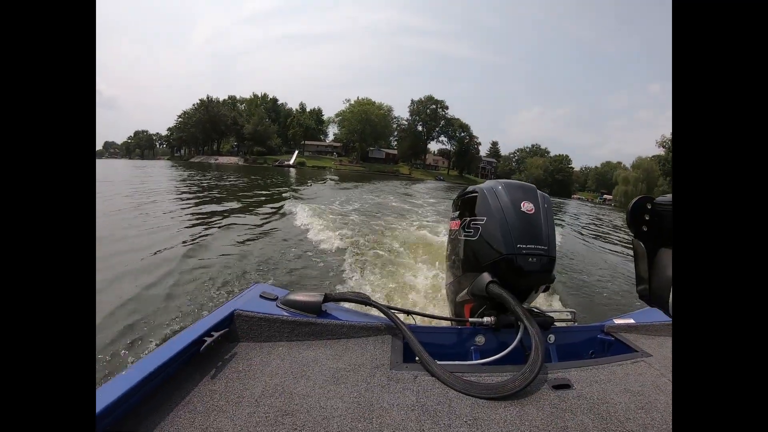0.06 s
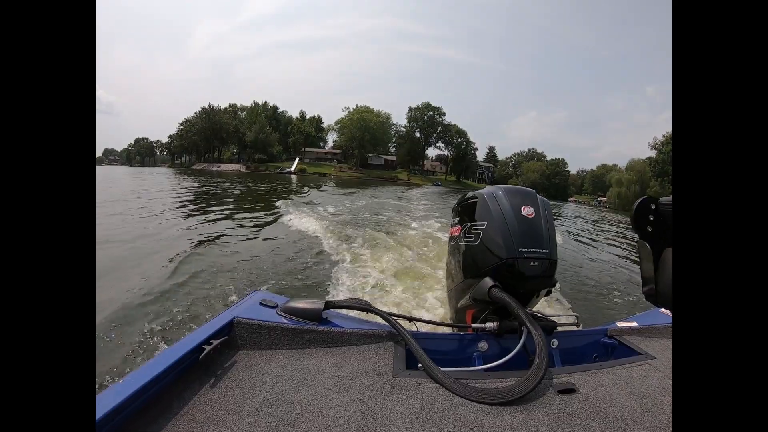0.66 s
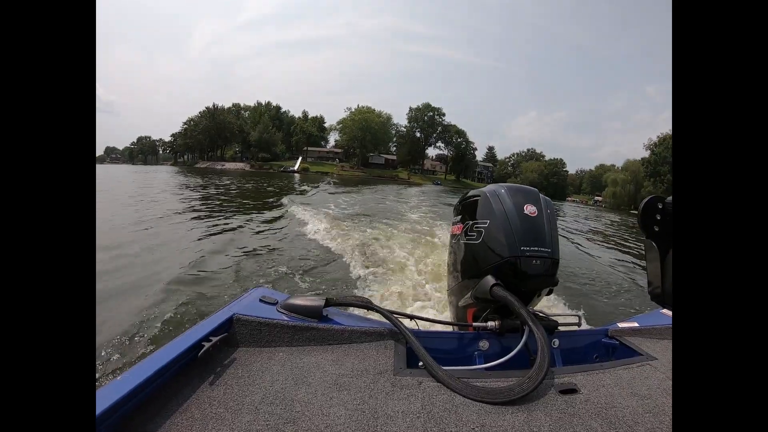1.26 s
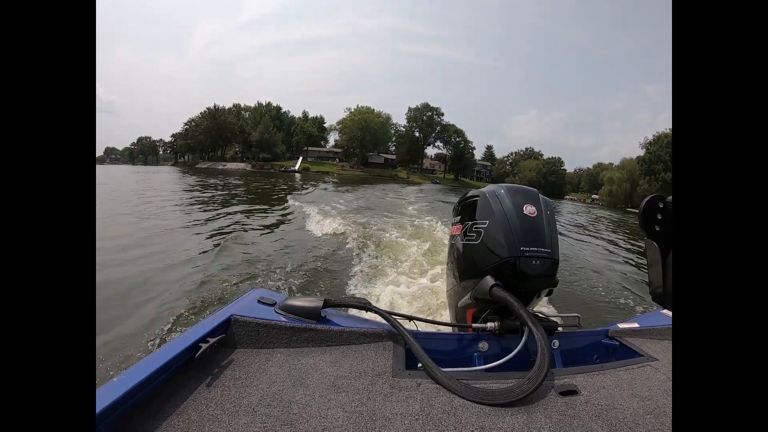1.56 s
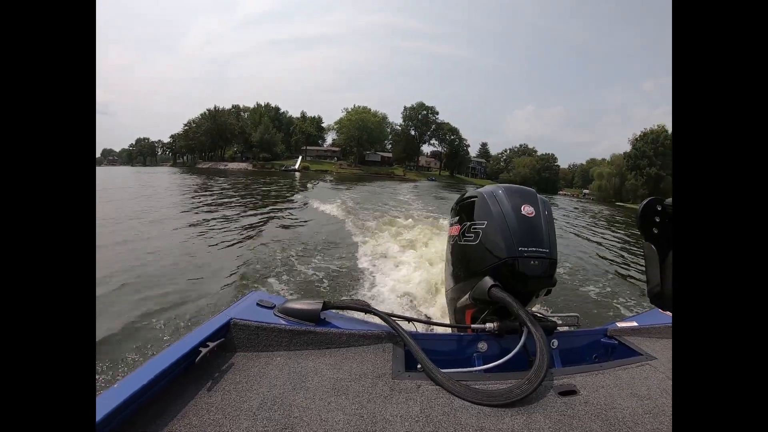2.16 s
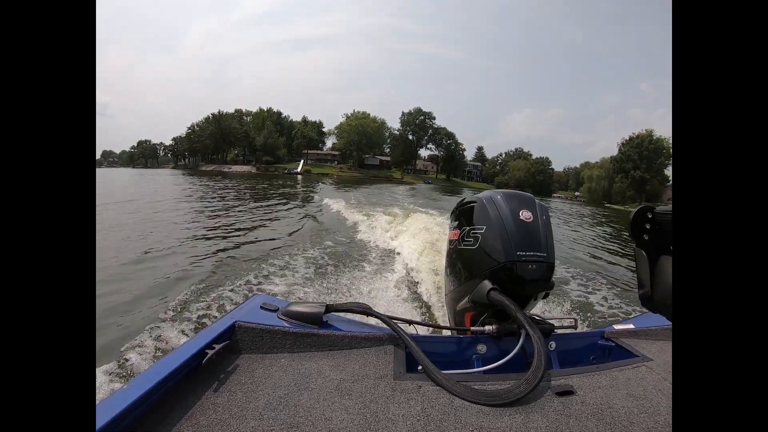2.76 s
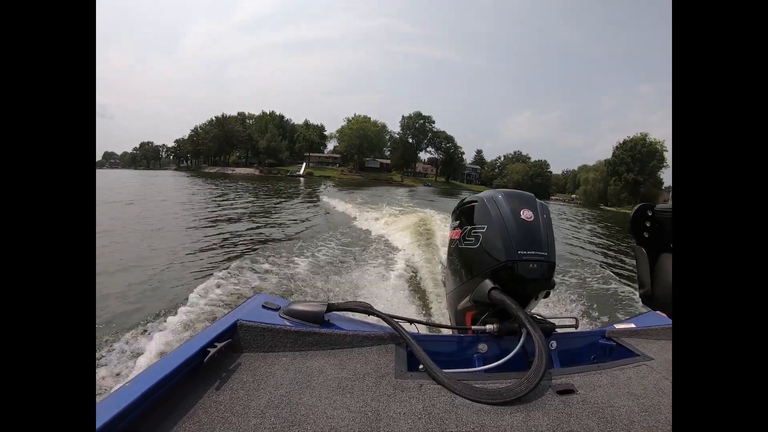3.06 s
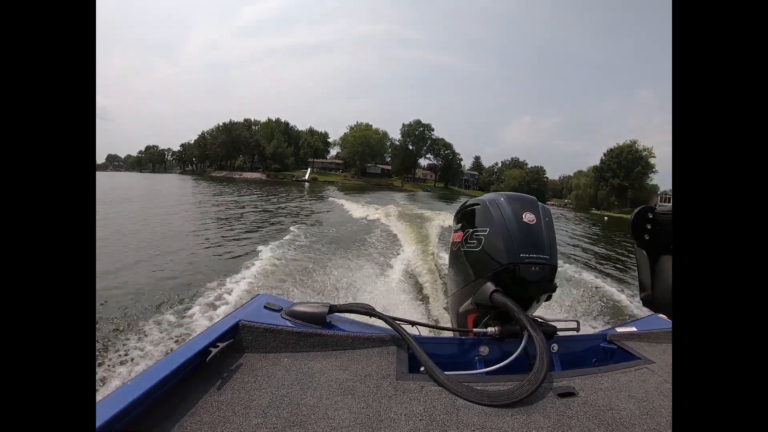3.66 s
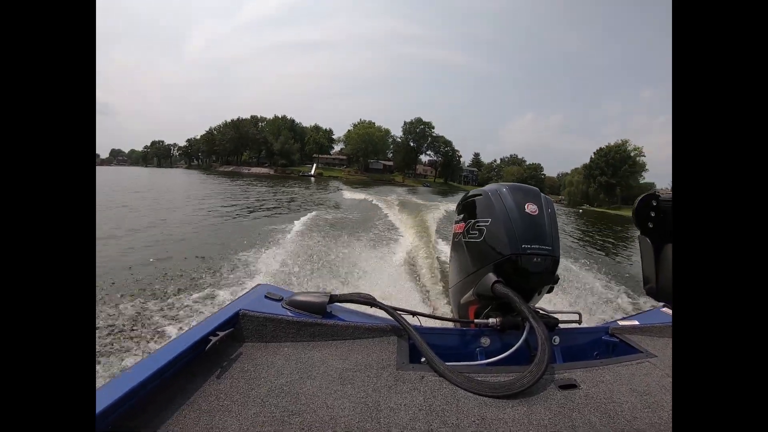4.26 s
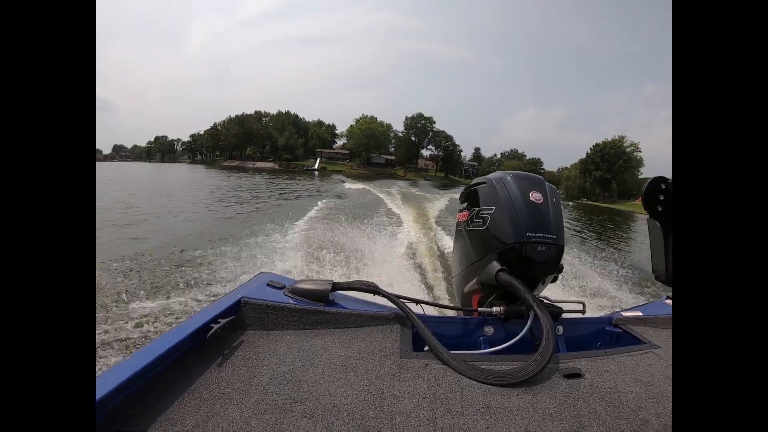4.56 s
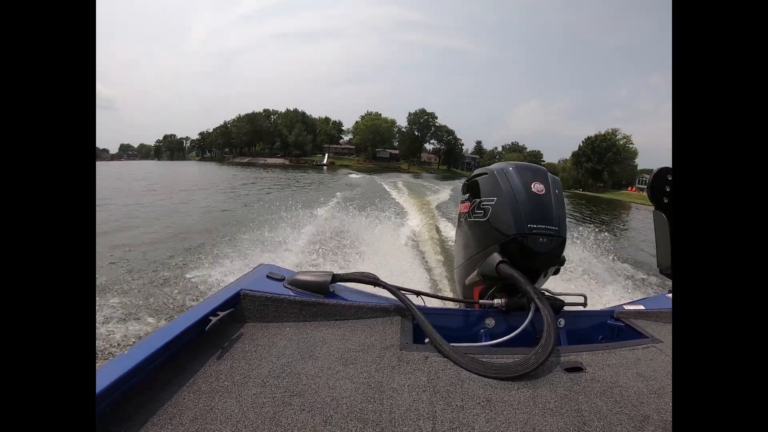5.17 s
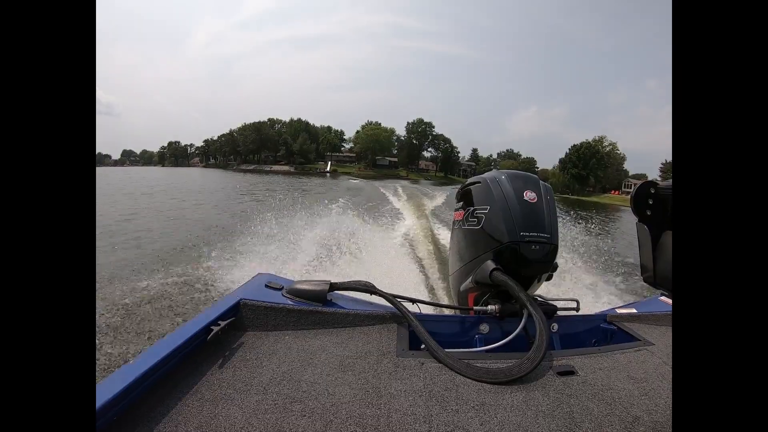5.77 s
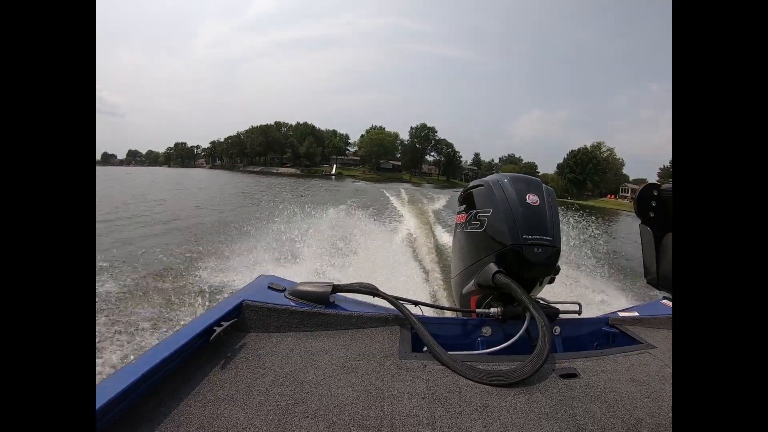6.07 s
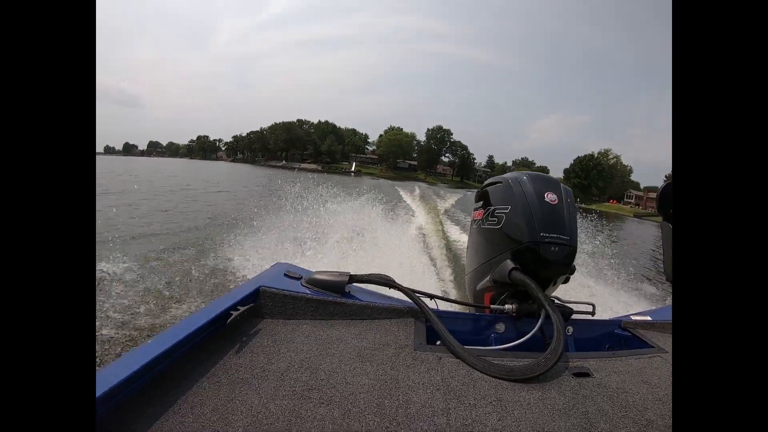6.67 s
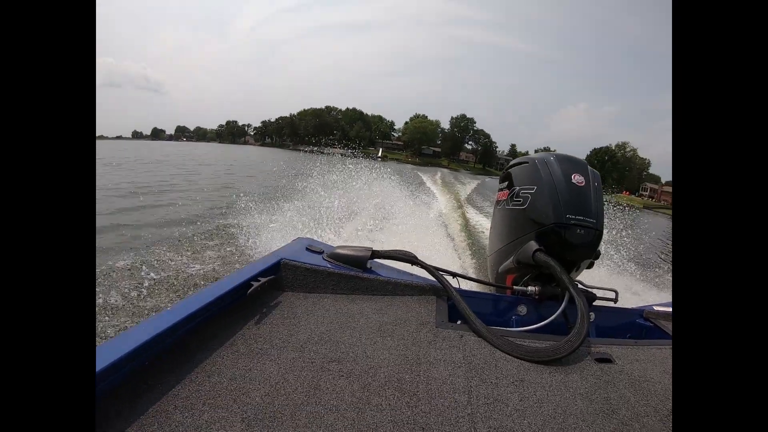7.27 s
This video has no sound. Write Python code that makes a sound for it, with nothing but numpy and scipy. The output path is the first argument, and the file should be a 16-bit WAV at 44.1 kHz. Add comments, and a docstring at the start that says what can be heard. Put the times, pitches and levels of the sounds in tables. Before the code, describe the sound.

Heard from the stern of a small boat on a lake, an outboard engine accelerates with a deep, raspy exhaust and light mechanical clatter over the steady rush of its wake. The pitch rises quickly at first, then more slowly. As the boat gathers speed, low wind buffets the microphone and ripples thump irregularly against the hull. The engine finally holds a constant drone, joined by a higher whine.

```python
"""A four-cylinder outboard opens up and drives a boat over its bow wave onto the plane, heard from aboard.
Periodic firing makes the exhaust boom and growl, valve impacts ring the cowl, and the meshing gears
whine at full speed. A thin whistle swells as the throttle opens. Bubbles churn in the wake, ripples
slap the hull and wind rumbles. The stereo image opens and brightens during the climb, then closes."""
import sys
import numpy as np
from scipy import signal
from scipy.fft import rfft, irfft, next_fast_len
from scipy.io import wavfile
from scipy.ndimage import uniform_filter1d, map_coordinates

SR = 44100
rng = np.random.default_rng(int(sys.argv[2]) if len(sys.argv) > 2 else 0)


def bounce(signal):
    """Save signal as a 16-bit WAV file at the path given by the first command-line argument."""
    frames = np.transpose(np.atleast_2d(signal))
    limited = np.clip(frames, -1, 1)
    pcm = np.round(limited * 32767).astype(np.int16)
    wavfile.write(sys.argv[1], SR, pcm)


N = 327663
PLANE_FROM_S, PLANE_FULL_S = 2.39, 4.7  # the hull lifts onto the plane


def exhaust_boom(firings, firing_hz, flutter_db=0.62, corner_hz=308.6):
    """Periodic excitation: one pressure wave per firing gives a fundamental and its harmonics."""
    # fundamental (time [s], level [dB])
    boom = [(0, -17), (.48, -20), (.63, -13.5), (1.2, -14), (1.8, -16.5), (1.98, -24), (2.5, -17.5),
            (3.2, -15.5), (3.7, -13.5), (3.95, -12), (4.9, -12.5), (5.3, -15), (7.43, -15.5)]
    # brief dips of the fundamental (time [s], depth [dB], half width [s])
    dips = [(1.505, 12, 0.042), (2.41, 5, 0.027), (6.6, 16, 0.026), (7.05, 6, .03)]
    # second harmonic (time [s], level [dB])
    second = [(0, -28.5), (1.45, -28.5), (1.7, -37.5), (2.15, -28), (2.8, -27), (3.35, -37), (4.4, -26),
              (4.9, -33), (7.43, -31.5)]
    boom_db = curve(boom) - sum(db * swell(s, width) for s, db, width in dips)
    # the third harmonic fades as it climbs out of the exhaust's pass band
    third_db = -31 - 20 * np.log10(1 + (3 * firing_hz / corner_hz) ** 10)
    phase = 2 * np.pi * firings
    wave = amp(boom_db + flutter_db * wobble(35)) * np.cos(phase + 0.1 * wobble(25))
    for k, db in [(2, curve(second)), (3, third_db)]:
        wave += amp(db + 1.5 * wobble(14)) * np.sin(k * phase + 0.12 * wobble(25))
    return np.sqrt(2) * wave


def exhaust_rasp(firings, effort_db, decay_per_firing=1.13):
    """Turbulence: each firing ejects a noisy puff, filtered by the pipe and softer on the plane."""
    # pipe response (frequency [Hz], relative gain [dB])
    pipe = [(60, -32), (130, -0.5), (180, 3), (270, -0.5), (340, -10), (440, -5), (600, -11), (780, -11.5),
            (900, -19), (3000, -22.5), (8000, -62)]
    level_db = effort_db + 10 - 14 * ramp(PLANE_FROM_S, PLANE_FULL_S)
    puffs = np.exp(-decay_per_firing * (firings % 1)) * noise()
    return amp(level_db) * unit(coloured(puffs, pipe))


def exhaust_growl(firings):
    """Amplitude modulation: unequal cylinders add tones between the firing harmonics, most under load."""
    # growl tones (frequency [multiples of crank speed], relative level [dB])
    tones = [(3, -9), (4.5, 0), (5, -1), (7, 1.5), (8, -5), (10, -15), (12.5, -14), (14, -10), (27.5, -13),
             (28.5, -13)]
    bow_wave_climb = swell(2.99, 0.84)
    level_db = -37.5 + 11.5 * bow_wave_climb - 11.5 * ramp(PLANE_FROM_S, PLANE_FULL_S)
    return amp(level_db) * crank_orders(firings, tones, waver_rad=0.2)


def cowl_clatter(firings, octaves, effort_db, looseness=2.16, lining_hz=5000):
    """Forced resonance: valve clatter, patterned over four firings, rings the lined cowl's panels."""
    # panel modes (frequency [Hz], bandwidth [Hz], relative level [dB])
    modes = [(715, 80, -5), (989, 51, -2), (1321, 84, -2), (1644, 80, 0), (2044, 84, -4.5), (2330, 140, -9),
             (2760, 280, -13), (3200, 250, -15.5)]

    def response(hz):
        panels = sum((-1) ** k * amp(db) * 1j * hz * width / (centre**2 - hz**2 + 1j * hz * width)
                     for k, (centre, width, db) in enumerate(modes))
        return panels / (1 + (hz / lining_hz) ** 4)

    pattern = map_coordinates(rng.standard_normal(512), [firings / 4 % 1 * 511])
    rattle = looseness * amp(2.2 * np.cos(2 * np.pi * firings)) * noise()
    return amp(effort_db + 0.04 + 4 * octaves) * unit(filtered(pattern + rattle, response))


def gear_whine(firings, octaves, db_per_octave=13.5, sing_db=11.5):
    """Periodic tooth contact radiates a mesh tone with sidebands, which sing out near full speed."""
    # mesh tone and sidebands (frequency [multiples of crank speed], relative level [dB])
    tones = [(20, -7), (21, -9), (22, -9), (24, -4), (24.5, -8), (25, 0), (26, -11), (31.5, -12)]
    level_db = -50 + db_per_octave * octaves + sing_db * ramp(5.3, 5.6)
    return amp(level_db) * crank_orders(firings, tones, waver_rad=0.6)


def wake(effort_db, patch_db=0.6, burst_db=2.0):
    """Bubble noise: foam boils in slow patches, with tiny bursts at scattered pitches."""
    # foam spectrum (frequency [Hz], relative density [dB])
    spectrum = [(100, 11.5), (250, 6), (520, 5), (1150, -3.5), (2500, -3), (3200, -4.5), (5000, -13),
                (6100, -22.5), (8300, -25.5), (10000, -31.5), (11000, -37), (15000, -56.5)]
    spectrogram = signal.stft(noise(), nperseg=256)[2]
    bursts = rng.standard_normal(spectrogram.shape[1:])
    patches = uniform_filter1d(uniform_filter1d(bursts, size=4, axis=0), size=20, axis=1)
    boiling = amp(patch_db * patches / patches.std() + burst_db * bursts)
    foam = signal.istft(spectrogram * boiling, nperseg=256)[1][:, :N]
    return amp(effort_db + 5) * unit(coloured(foam, spectrum))


def hull_slaps(gain_db=18, rise_s=0.011, decay_s=0.014, ripples_per_s=7.7):
    """Damped impact: each ripple strikes the hull with a dull splash that decays exponentially."""
    # loudest ripples (time [s], relative level [dB])
    loud = [(3.699, -23.5), (3.853, -23), (4.095, -20), (5.149, -23.5), (5.356, -21), (5.805, -15),
            (6.062, -18.5), (6.176, -23), (6.284, -20.5), (6.548, -18.5), (6.569, -21.5), (6.694, -23.5),
            (7.034, -20)]
    # hull response (frequency [Hz], gain [dB])
    hull = [(30, -6), (200, 2), (330, 5), (450, -2), (800, -3), (1300, -11), (2200, -22), (5000, -48),
            (12000, -90)]
    delay, strength = rng.random((40, 2)).T  # lesser ripples, once the hull planes
    lesser_s = PLANE_FULL_S + (np.arange(len(delay)) + delay) / ripples_per_s
    lesser_db = -30 + strength
    envelope = np.zeros(N)
    for s, db in [*loud, *zip(lesser_s, lesser_db)]:
        age = np.maximum(np.arange(N) / SR - s, 0)
        envelope += amp(db + gain_db) * (1 - np.exp(-age / rise_s)) * np.exp(-age / decay_s)
    return coloured(envelope * unit(noise()), hull)


def wind(effort_db, rise_db=8.5):
    """Turbulent pressure fluctuations make an uneven rumble that rises as the head wind grows."""
    # rumble spectrum (frequency [Hz], relative density [dB])
    spectrum = [(12, -17), (25, 1.5), (70, 2.5), (110, 4), (160, -5.5), (280, -9), (400, -23), (3000, -80)]
    gusts = amp(1.2 * wobble(13))
    level_db = effort_db + 8.5 + rise_db * ramp(3.05, 5.25)
    return amp(level_db) * unit(gusts * coloured(noise(), spectrum))


def whistle(centre_hz=8000, half_width_hz=130):
    """Narrow-band noise is heard as an airy pitch, strongest as the throttle opens."""
    band = filtered(noise(), lambda hz: 1 / (1 + ((hz - centre_hz) / half_width_hz) ** 2))
    return amp(-77 + 13 * swell(0.72, 0.27)) * unit(band)


def crank_orders(firings, tones, waver_rad):
    """Superposition of unsteady tones at multiples of the crank speed, half the firing rate."""
    return unit(sum(amp(db + 1.6 * wobble(20))
                    * np.sin(np.pi * k * firings + 2 * np.pi * rng.random() + waver_rad * wobble(30))
                    for k, db in tones))


def amp(db):
    """Decibels to amplitude ratio."""
    return 10 ** (np.asarray(db) / 20)


def unit(x):
    """Scale the channels' mean to rms 1."""
    return x / np.sqrt(np.mean(np.atleast_2d(x).mean(axis=0) ** 2) + 1e-20)


def along(points, hz):
    """Interpolate (frequency [Hz], value) points on a log axis."""
    f, v = np.transpose(points)
    return np.interp(np.log(hz + 1), np.log(f), v)


def curve(points):
    """Interpolate (time [s], value) points at every sample."""
    return np.interp(np.arange(N) / SR, *np.transpose(points))


def ramp(start_s, end_s):
    """Linear rise from 0 to 1."""
    return np.clip((np.arange(N) / SR - start_s) / (end_s - start_s), 0, 1)


def swell(centre_s, half_width_s):
    """Gaussian bell of height 1."""
    return np.exp(-((np.arange(N) / SR - centre_s) / half_width_s) ** 2)


def wobble(knots_per_s):
    """Smooth random modulation."""
    return map_coordinates(rng.standard_normal(4096), [np.arange(N) * knots_per_s / SR])


def noise():
    """Uncorrelated white noise for left and right."""
    return rng.standard_normal((2, N))


def filtered(x, response):
    """Linear filtering: multiply the spectrum by a frequency response."""
    size = next_fast_len(N + SR // 2)
    return irfft(rfft(x, size) * response(np.fft.rfftfreq(size, 1 / SR)), size)[..., :N]


def coloured(x, spectrum):
    """Filter x by (frequency [Hz], gain [dB]) points."""
    return filtered(x, lambda hz: amp(along(spectrum, hz)))


def scene():
    """Superposition: the engine, driven by speed and effort, adds to water and wind."""
    # engine speed (time [s], firing rate [Hz])
    speed = [(0, 57), (.52, 56.7), (.64, 61.8), (.78, 73.9), (.92, 75.3), (1.72, 95.3), (2.2, 104.5),
             (2.46, 111.3), (2.85, 115), (5.8, 130.9), (7.43, 131.2)]
    # how hard the propeller churns the water (time [s], relative level [dB])
    effort = [(0, -37.5), (.5, -36), (1.24, -42.5), (2.54, -34.5), (3.7, -37), (4.9, -40), (5.85, -37),
              (7.43, -36.5)]
    firing_hz, effort_db = curve(speed), curve(effort)
    firings = np.cumsum(firing_hz) / SR
    octaves = np.log2(firing_hz / firing_hz.max())  # relative to top speed
    exhaust = exhaust_boom(firings, firing_hz) + exhaust_rasp(firings, effort_db) + exhaust_growl(firings)
    machinery = cowl_clatter(firings, octaves, effort_db) + gear_whine(firings, octaves)
    return exhaust + machinery + wind(effort_db) + wake(effort_db) + hull_slaps() + whistle()


def record(dry, cutoff_hz=15600):
    """Mid-side stereo, band-limited: the image opens from mono, brightens and leans right, then closes."""
    # treble lift of the open image's mid (frequency [Hz], gain [dB])
    lift = [(4500, 0.4), (6200, 7.8), (7800, 9.7), (8600, 3.8), (9500, 6.9), (10700, 3), (13000, 8)]
    # side signal of the open image (frequency [Hz], gain [dB])
    width = [(60, -5), (250, -7), (500, -5), (1200, -9), (3500, -13), (7000, 6)]
    # lean of the open image (frequency [Hz], pull to the right [0-1])
    lean = [(250, .03), (640, .15), (1400, .38), (3100, .25), (7000, .1)]
    opening = ramp(0.98, 3) * (1 - ramp(3.71, 4.1))
    mid, side = (dry[0] + dry[1]) / 2, (dry[0] - dry[1]) / 2
    side = opening * (coloured(side, width) - filtered(mid, lambda hz: along(lean, hz)))
    mid = mid + opening * (coloured(mid, lift) - mid)
    end_fades = signal.windows.tukey(N, 0.001)
    return filtered(np.array([mid + side, mid - side]) * end_fades, lambda hz: hz < cutoff_hz)


dry = scene()
out = record(dry)
bounce(out)
```